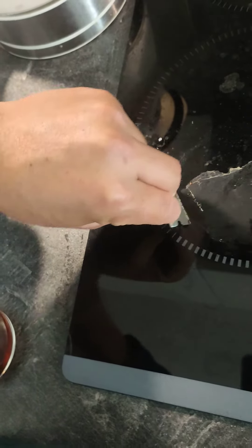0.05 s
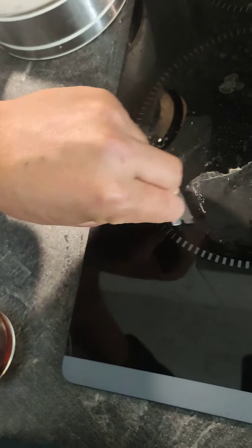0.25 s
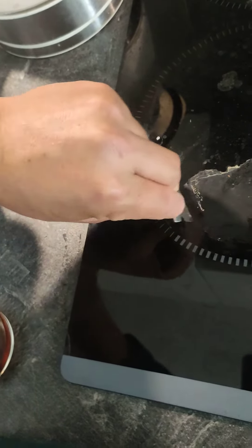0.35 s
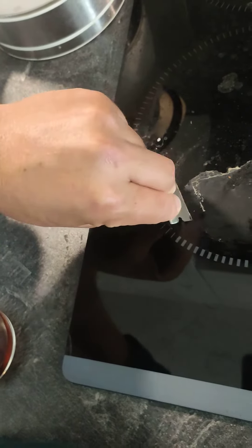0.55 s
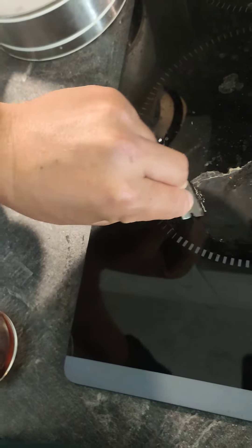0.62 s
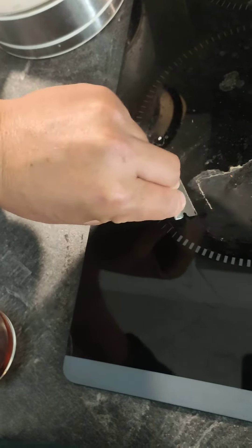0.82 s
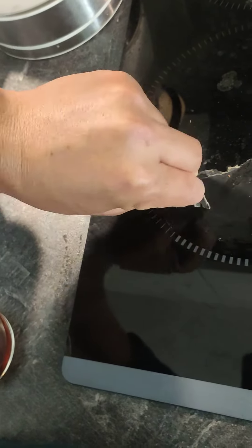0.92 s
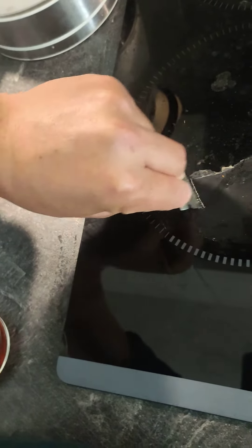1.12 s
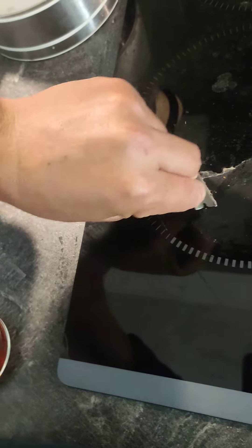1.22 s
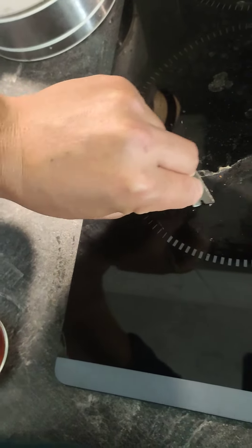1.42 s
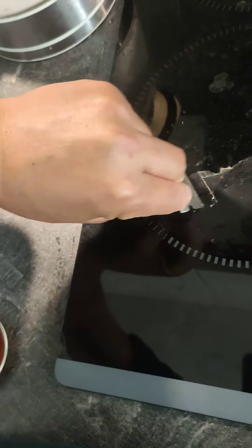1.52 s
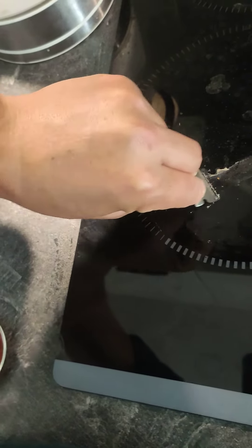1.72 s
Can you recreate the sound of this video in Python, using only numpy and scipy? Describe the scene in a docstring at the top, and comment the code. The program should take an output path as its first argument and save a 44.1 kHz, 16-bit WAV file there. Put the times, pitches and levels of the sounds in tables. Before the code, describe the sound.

Close, rasping scrapes of a metal blade on a glass cooktop in a quiet kitchen. The crust cracks loudly on the first push, then six softer strokes follow evenly, with light return slides, small snags and faint squeaks.

```python
"""Scraping a glass cooktop

A steel blade scrapes burnt residue off glass, four short pushes a second, in a quiet kitchen.
The crumbling crust is a random force: it rasps through the glass and makes the blade ring.
Between pushes the blade slides back lightly. On the first push it catches hard and snaps free;
later it snags lightly and squeaks faintly, and something knocks softly."""
import sys
import numpy as np
from scipy import signal
from scipy.fft import rfft, irfft, next_fast_len
from scipy.io import wavfile

SR = 44100
rng = np.random.default_rng(int(sys.argv[2]) if len(sys.argv) > 2 else 0)


def dump_mix(stems):
    """Bounce the given channels to the path in sys.argv[1] as a 16-bit WAV at rate SR."""
    frames = np.atleast_2d(stems).T  # one column per channel
    limited = np.clip(frames, -1, 1)  # hard clip at full scale
    pcm = np.round(limited * 32767).astype(np.int16)
    wavfile.write(sys.argv[1], SR, pcm)


N = 77175
T = np.arange(N) / SR
PADDED = 2 * next_fast_len(N * 3 // 4)
HZ = np.maximum(np.arange(PADDED // 2 + 1) * SR / PADDED, 1)

# normal modes (frequency [Hz], bandwidth [Hz], level over the broad response [dB], left-right [dB])
GLASS_MODES = [(192, 32, 14, 1.5), (386, 15.5, 18, -8), (634, 70, 12, 1), (997, 73, 3.5, 0),
               (1240, 38, 1, 13.5), (1420, 17, -9, -7), (1477, 29, 5, -6), (1740, 99, 4.5, -16),
               (2237, 30, -1.5, -7.5), (2525, 27, 16, -9.5), (2970, 50, -2.5, -4), (2995, 93, 10, -1),
               (3090, 34, -15, 5), (3533, 17, 10.5, 43)]
BLADE_MODES = [(5610, 170, 9, 4), (5910, 61, 2.5, -26), (6300, 63, -13, 27), (6530, 60, -2, -1),
               (6510, 87, 9.5, 1), (6850, 150, 6, 10), (6940, 74, -4, 7), (8100, 70, -7, -21),
               (8400, 110, 8, 0), (9460, 70, 4, 9)]
# broad low response of the glass (frequency [Hz], level [dB])
THRUM_SPECTRUM = [(20, -50), (55, -28), (100, -3), (170, -11), (240, -3.5), (310, 3), (400, -0.5),
                  (500, -14), (900, -23), (3000, -58)]
# stereo balance (frequency [Hz], left-right [dB])
BALANCE = [(60, 6.5), (200, 1.5), (380, 12), (700, 6.5), (1290, 14.5), (2380, 8.5), (4400, -1.5),
           (6000, 3.5), (8120, 1.5), (11000, -6), (15000, 1)]


def scraping(ripple_db):
    """Forced vibration: crumbling crust drives glass and blade; overlapping strokes add in power."""
    # (peak time [s], rise [s], fall [s], rasp [dB], thrum [dB], blade [dB], grit [dB],
    # thrum lead [s], boom [dB])
    pushes = [(0.205, 0.038, 0.046, -42.5, -55, -45.5, -48.5, 0.061, -63),
              (0.486, 0.035, 0.037, -45, -60.5, -49.5, -50, 0.028, -59.5),
              (0.732, 0.07, 0.024, -50.5, -64, -55, -56.5, 0.034, -74.5),
              (0.996, 0.049, 0.014, -47, -60, -47, -49.5, 0.034, -67),
              (1.243, 0.051, 0.033, -47.5, -56.5, -49.5, -49.5, 0.025, -73),
              (1.5, 0.069, 0.026, -51, -61, -55, -56, 0.04, -76.5),
              (1.745, 0.072, .030, -50, -55.5, -54, -55.5, 0.016, -68)]
    # return strokes (time [s], rasp [dB], blade [dB])
    slides = [(0.02, -56.5, -61.5), (0.095, -60.5, -80), (0.33, -60, -56), (0.58, -83, -66),
              (0.815, -62, -65.5), (1.068, -60, -61.5), (1.335, -64, -58), (1.575, -63.5, -60.5)]
    # broad responses of glass, edge and blade (frequency [Hz], level [dB])
    rasp_spectrum = [(150, -32.5), (350, -13.5), (500, -13.5), (800, -11.5), (1050, -3.5), (1500, -0.5),
                     (2200, -3), (2800, -14.5), (4500, -17), (15000, -64)]
    grit_spectrum = [(1000, -72), (2300, -1), (3200, 2.5), (3900, 5.5), (4500, 1), (5200, 0.5), (7500, 0),
                     (10000, -6.5), (12500, -15), (15500, -14)]
    blade_spectrum = [(2000, -30.5), (4900, -5.5), (5600, -5), (6100, 1.5), (6850, -3.5), (7400, -16),
                      (8800, -33.5), (9500, -39), (15500, -37)]
    rasp = thrum = grit = boom = 0
    blade = from_db(-65.5)  # the blade never quite leaves the glass
    for at, rise, fall, rasp_db, thrum_db, blade_db, grit_db, lead, boom_db in pushes:
        force = swell(at, rise, fall)
        rasp = np.hypot(rasp, from_db(rasp_db) * force)
        blade = np.hypot(blade, from_db(blade_db) * force)
        grit = np.hypot(grit, from_db(grit_db) * force)
        thrum = np.hypot(thrum, from_db(thrum_db) * swell(at - lead, rise_s=.021, fall_s=.043))
        boom = np.hypot(boom, from_db(boom_db) * swell(at, rise_s=.026, fall_s=.061))
    for at, rasp_db, blade_db in slides:
        force = gaussian(at, sigma_s=.04)
        rasp = np.hypot(rasp, from_db(rasp_db) * force)
        blade = np.hypot(blade, from_db(blade_db) * force)
    judder = from_db(1.36 * drift(rate_hz=37))
    paths = [(thrum, THRUM_SPECTRUM, GLASS_MODES), (rasp, rasp_spectrum, GLASS_MODES),
             (grit, grit_spectrum, GLASS_MODES), (blade, blade_spectrum, BLADE_MODES)]
    crumbling = sum(radiate(level * judder * grains(), body(spectrum, modes, ripple_db))
                    for level, spectrum, modes in paths)
    return crumbling + boom * friction_tone(hz=115, width_hz=25)


def grains(per_s=9000, spread_db=1.5):
    """Shot noise: tiny fractures of uneven size occur independently; rms 1."""
    sizes = from_db(spread_db * np.minimum(rng.exponential(1, N), 5))
    clicks = (rng.random(N) < per_s / SR) * sizes * rng.choice([-1, 1], (2, N))
    return clicks / clicks.std()


def snaps(ripple_db, rise_s=.00059):
    """Brittle fracture: hard crust gives way in bursts that ring blade and glass, and flakes click off."""
    # (time [s], decay [s], blade [dB], glass [dB], thrum [dB])
    releases = [(0.2131, 0.0091, -28, -32, -39.5), (0.226, 0.0035, -23, -34.5, -42.5),
                (0.2299, 0.00066, -19.5, -32, -52), (0.2318, 0.0014, -12.5, -37, -46),
                (0.9973, 0.0044, -37.5, -45, -82), (1.2030, 0.015, -51, -66, -56.5),
                (1.724, 0.0094, -55, -76, -56), (1.7322, 0.0039, -49, -54, -56)]
    # chipping flakes (time [s], level [dB])
    flakes = [(0.2305, -4), (0.2340, -16)]
    # broad responses of blade, glass and flake (frequency [Hz], level [dB])
    snap_spectrum = [(1500, -26), (4500, -9.5), (5600, -2), (6900, -0.5), (7450, -3), (8700, -10),
                     (9450, -17), (9950, -9), (10900, -22), (11600, -13), (15500, -37)]
    crack_spectrum = [(25, -38), (90, -26), (170, -10), (270, 11.5), (500, -16.5), (1300, 9.5),
                      (2400, 13.5), (3700, 6), (5000, -11), (12000, -37)]
    chip_spectrum = [(1000, -19), (4500, -13), (7000, 7.5), (9000, -7.5), (10500, -16), (13000, -11),
                     (15500, -18)]
    blade = glass = thrum = 0
    for at, decay_s, blade_db, glass_db, thrum_db in releases:
        age = np.maximum(T - at, 0)
        burst = (1 - np.exp(-age / rise_s)) * np.exp(-age / decay_s)
        blade += from_db(blade_db) * burst
        glass += from_db(glass_db) * burst
        thrum += from_db(thrum_db) * burst
    paths = [(blade, snap_spectrum, BLADE_MODES), (glass, crack_spectrum, GLASS_MODES),
             (thrum, THRUM_SPECTRUM, GLASS_MODES)]
    ringing = sum(radiate(level * rng.choice([-1, 1], (2, N)), body(spectrum, modes, ripple_db))
                  for level, spectrum, modes in paths)
    chips = np.zeros((2, N))
    for at, db in flakes:
        chips[0, int(at * SR)] += from_db(db)
    return ringing + radiate(chips, body(chip_spectrum))


def squeaks():
    """Friction excites narrow resonances: the edge sings briefly at the height of a push."""
    # (time [s], Gaussian width [s], frequency [Hz], bandwidth [Hz], level [dB])
    tones = [(0.496, 0.017, 1017, 72, -49), (0.991, 0.011, 3012, 110, -48.5),
             (0.999, 0.015, 3900, 111, -50.5)]
    return sum(from_db(db) * gaussian(at, sigma) * friction_tone(hz, width)
               for at, sigma, hz, width, db in tones)


def friction_tone(hz, width_hz):
    """A mode driven by random friction gives narrow-band noise; rms 1."""
    response = resonance(hz, width_hz) ** 2 * pan(at_hz(BALANCE))
    tone = radiate(rng.standard_normal((2, N)), response)
    return tone / tone.std()


def knock(at_s=1.6125, rise_s=.0036):
    """Free vibration: three damped modes ring after a soft contact to the left."""
    # (frequency [Hz], T60 [s], level [dB])
    modes = [(1283, 0.065, -41.5), (1338, 0.029, -32.5), (1534, 0.033, -40)]
    age = np.maximum(T - at_s, 0)
    ring = sum(from_db(db - 60 * age / t60) * np.sin(2 * np.pi * hz * age) for hz, t60, db in modes)
    return pan(db=19) * ring * (1 - np.exp(-age / rise_s))


def body(spectrum, modes=(), ripple_db=0):
    """Modes add in power to a broad spectrum, giving a stereo response of unit power."""
    power = 1 + sum(np.abs(from_db(db) * pan(side_db) * resonance(hz, width)) ** 2
                    for hz, width, db, side_db in modes)
    gain = from_db(at_hz(spectrum) + ripple_db) * np.sqrt(power) * pan(at_hz(BALANCE))
    return minimum_phase(gain / np.sqrt(np.mean(gain ** 2)))


def weak_modes(spacing_hz=40):
    """Modal overlap: countless weak modes ripple the response, differently on each side; in dB."""
    centres = np.arange(0, SR / 2, spacing_hz)
    heights = rng.standard_normal((1500, 2))[:len(centres)]
    depth_db = 4.5 * np.clip(HZ / 3000, 0, 1)
    return depth_db * np.array([np.interp(HZ, centres, side) for side in heights.T])


def radiate(drive, response, left_delay_s=.0002):
    """Partial coherence: two drives mix so that the bass reaches both sides alike, the left later."""
    # (frequency [Hz], left-right correlation [1])
    coherence = [(60, .98), (290, 0.99), (640, 0.76), (1400, 0.046), (3000, 0.04), (6800, 0.29),
                 (15000, 0.065)]
    mid, side = rfft(drive, PADDED)
    alike = at_hz(coherence)
    both = np.sqrt((1 + alike) / 2) * mid + np.sqrt((1 - alike) / 2) * side * np.array([[1], [-1]])
    both[0] *= np.exp(-2j * np.pi * HZ * left_delay_s)
    return irfft(both * response)[:, :N]


def reverberation(sound, delay_s=.012):
    """A diffuse field: dense reflections decay exponentially, at their own rate in each of three bands."""
    # reverberant gain (frequency [Hz], level [dB])
    room_spectrum = [(100, -22.5), (400, -14), (1200, -8.5), (3000, -8.5), (6500, -11.5), (8500, -9.5),
                     (10000, -23.5), (15000, -10.5)]
    treble_from_hz, middle_from_hz = 4100, 340
    band_t60_s = (.55, .35, .32)  # bass, middle, treble
    band = np.digitize(HZ, (middle_from_hz, treble_from_hz))
    age = np.maximum(T - delay_s, 0)
    reflections = rng.standard_normal((2, N)) * (1 - np.exp(-age / delay_s))
    tails = 0
    for k, t60 in enumerate(band_t60_s):
        tail = reflections * from_db(-60 * age / t60)
        tails += (band == k) * rfft(tail / np.linalg.norm(tail[0]), PADDED)
    colour = minimum_phase(from_db(at_hz(room_spectrum)))
    return irfft(rfft(sound, PADDED) * tails * colour)[:, :N]


def still_air():
    """Stationary noise: the faint rumble and hiss of a quiet room."""
    # (frequency [Hz], level [dB])
    air_spectrum = [(20, -2), (33, -4), (45, 8), (62, -9), (80, 0.5), (110, 2.5), (160, -4), (500, -2),
                    (1300, 0.5), (3000, -18.5), (4800, -5.5), (6300, 2.5), (8000, -2), (12000, -5),
                    (15500, -14)]
    return from_db(-61.5) * radiate(rng.standard_normal((2, N)), body(air_spectrum))


def swell(at_s, rise_s, fall_s, rounding_s=.0041):
    """The force of a push grows and decays exponentially about a rounded peak."""
    away = np.hypot(T - at_s, rounding_s) - rounding_s
    return np.exp(-away / np.where(T < at_s, rise_s, fall_s))


def gaussian(at_s, sigma_s):
    """A Gaussian envelope of peak 1."""
    return np.exp(-.5 * ((T - at_s) / sigma_s) ** 2)


def drift(rate_hz):
    """Low-passed noise wanders smoothly; standard deviation 1."""
    pole = np.exp(-2 * np.pi * rate_hz / SR)
    slow = signal.lfilter([1], [1, -2 * pole, pole * pole], rng.standard_normal(2 * N))[N:]
    return slow / slow.std()


def resonance(hz, width_hz):
    """Response of a damped oscillator, 1 at resonance."""
    return 1 / (1 + 1j * (HZ ** 2 - hz ** 2) / (HZ * width_hz))


def minimum_phase(gain):
    """Causality: folding the cepstrum gives a filter of this gain in which nothing sounds early."""
    cepstrum = irfft(np.log(gain + 1e-9))
    cepstrum[..., 1:PADDED // 2] *= 2
    cepstrum[..., PADDED // 2 + 1:] = 0
    return np.exp(rfft(cepstrum))


def pan(db):
    """Constant-power gains for a left-right level difference."""
    gains = from_db(np.array([[.5], [-.5]]) * db)
    return gains / np.sqrt(np.mean(gains ** 2, axis=0))


def at_hz(points):
    """Linear interpolation over log frequency."""
    hz, value = np.transpose(points)
    return np.interp(np.log(HZ), np.log(hz), value)


def from_db(db):
    """Decibels to amplitude ratio."""
    return 10 ** (np.asarray(db) / 20)


def scene():
    """Superposition of the direct sound, its reverberation and the still air."""
    ripple_db = weak_modes()
    direct = scraping(ripple_db) + snaps(ripple_db) + squeaks() + knock()
    return direct + reverberation(direct) + still_air()


def record(dry):
    """Band limiting: an elliptic low-pass cuts the highest treble steeply."""
    cutoff_hz = 15750
    return signal.sosfilt(signal.ellip(12, .1, 80, cutoff_hz, fs=SR, output="sos"), dry)


dry = scene()
out = record(dry)
dump_mix(out)
```